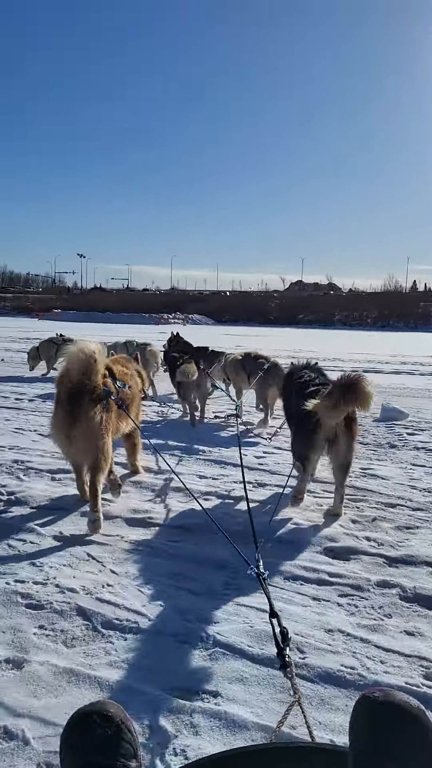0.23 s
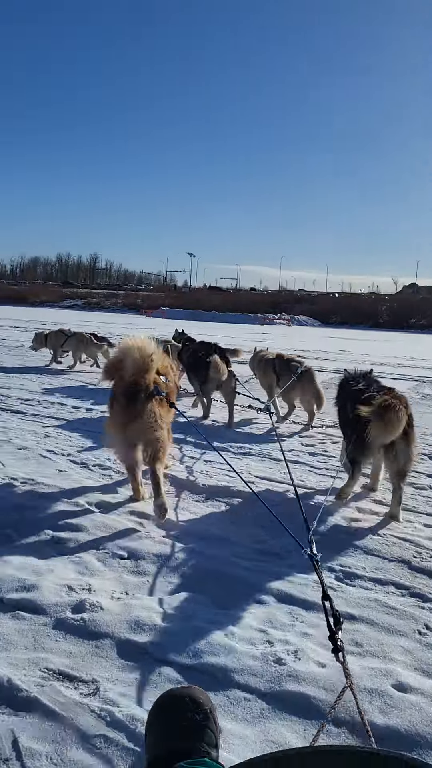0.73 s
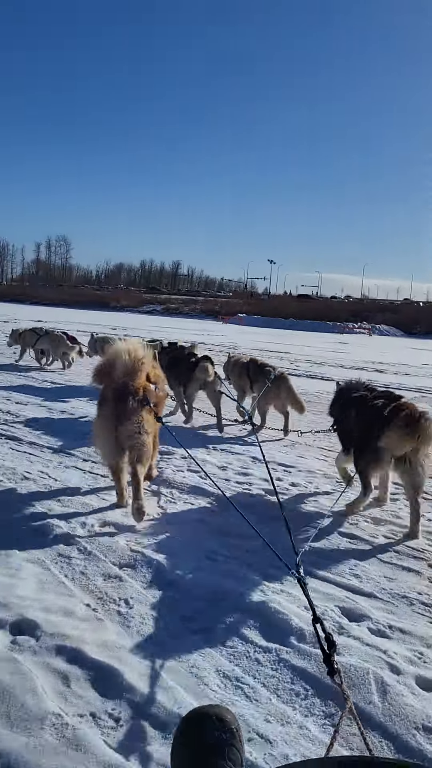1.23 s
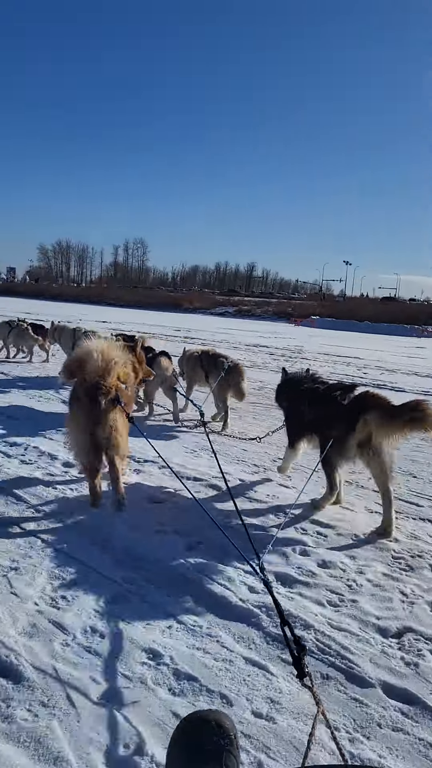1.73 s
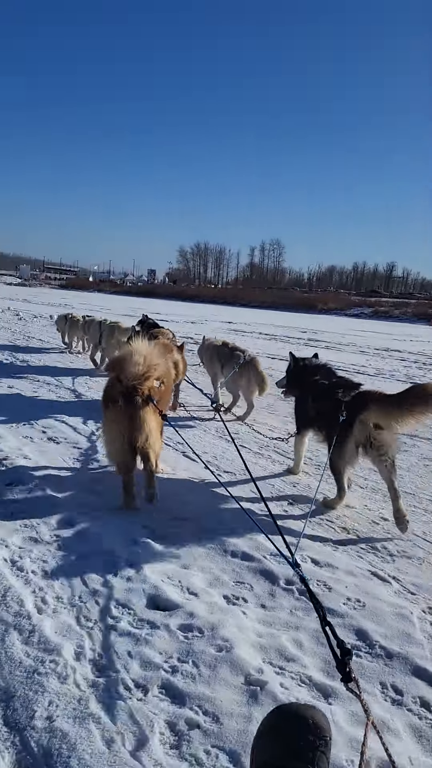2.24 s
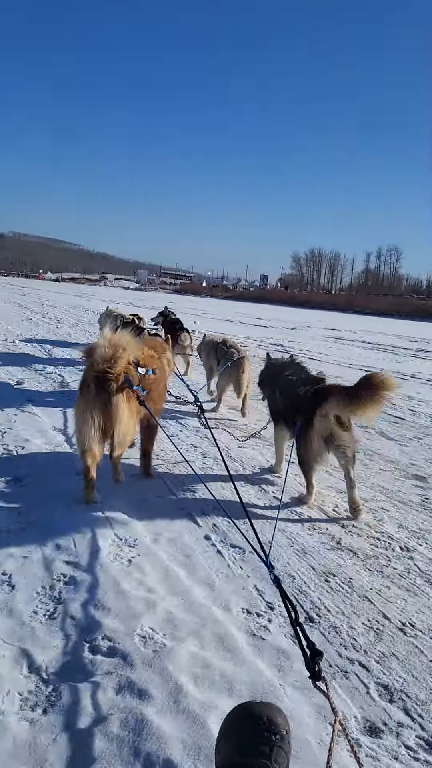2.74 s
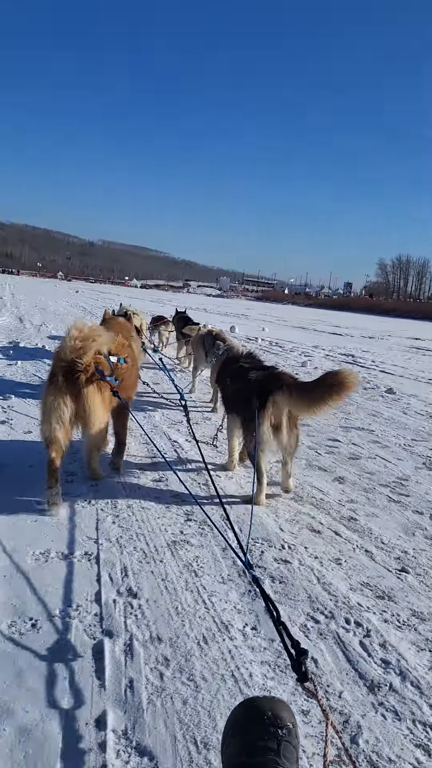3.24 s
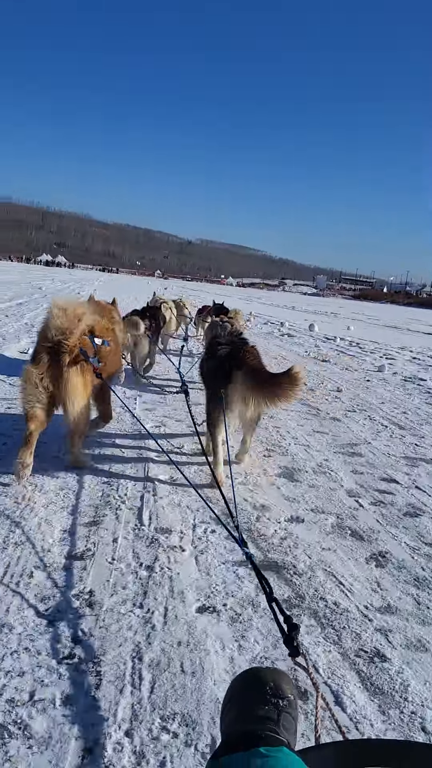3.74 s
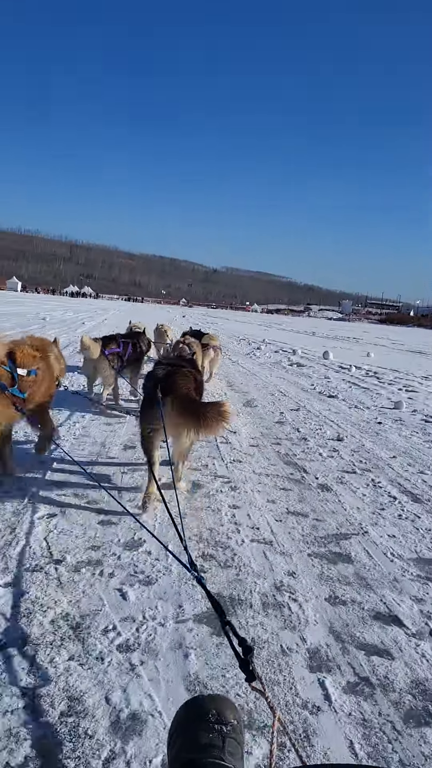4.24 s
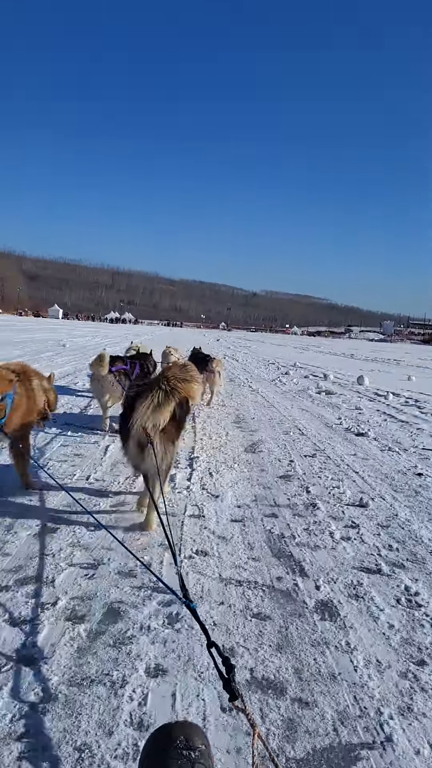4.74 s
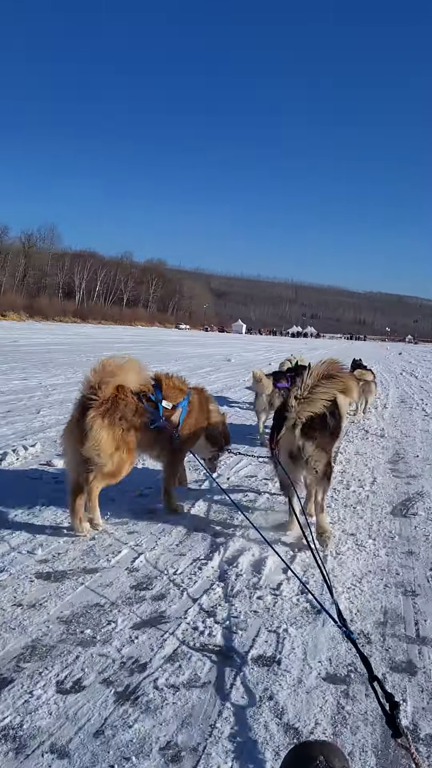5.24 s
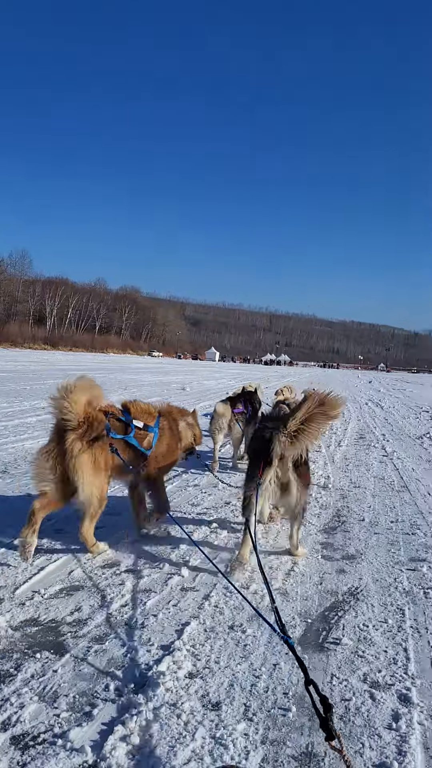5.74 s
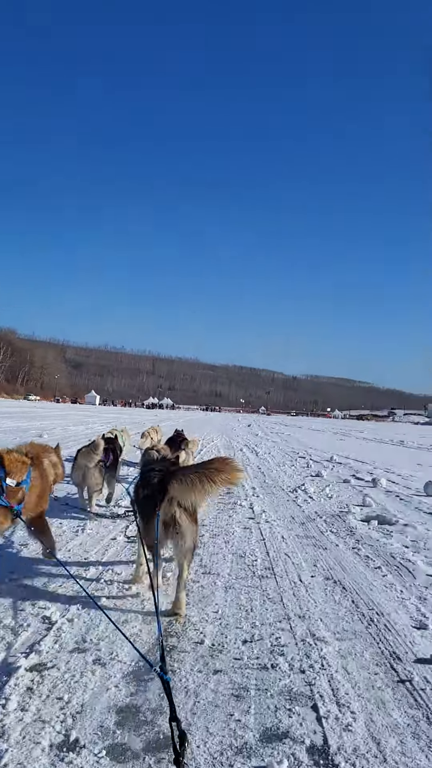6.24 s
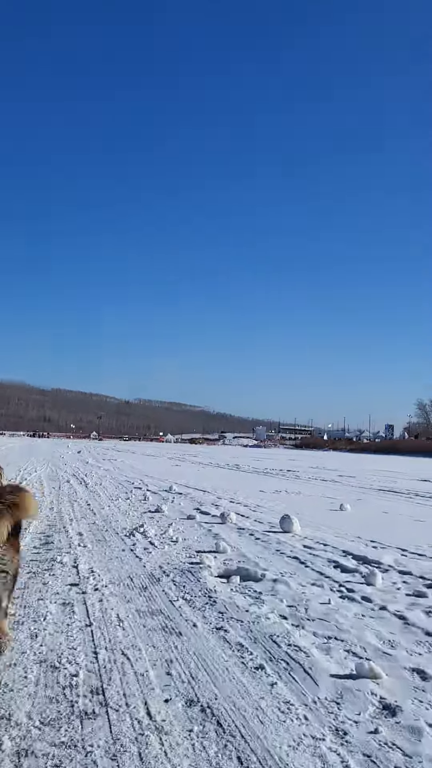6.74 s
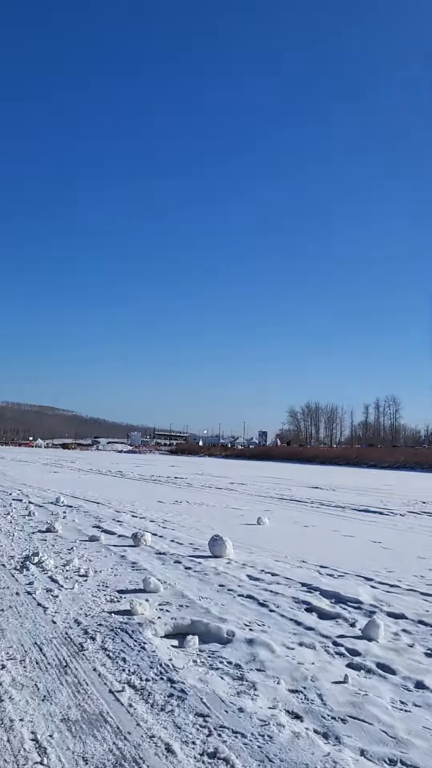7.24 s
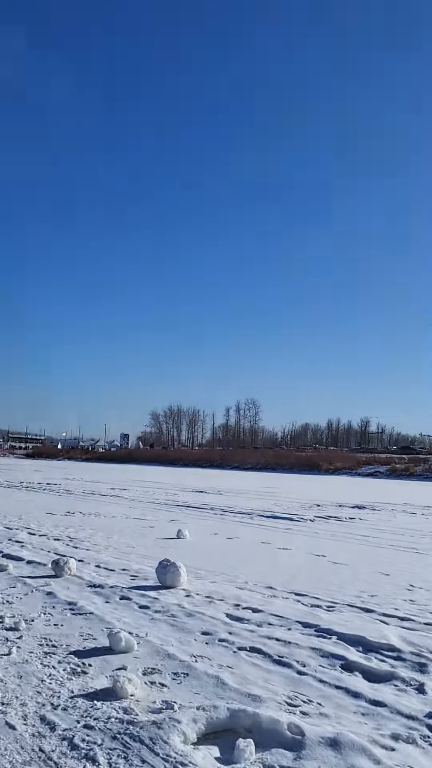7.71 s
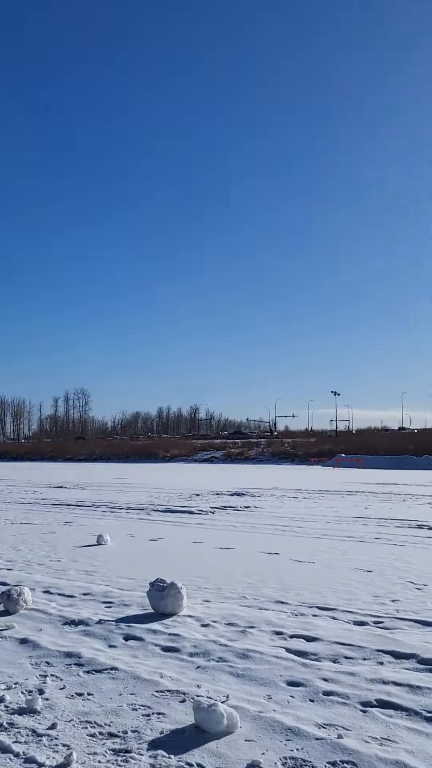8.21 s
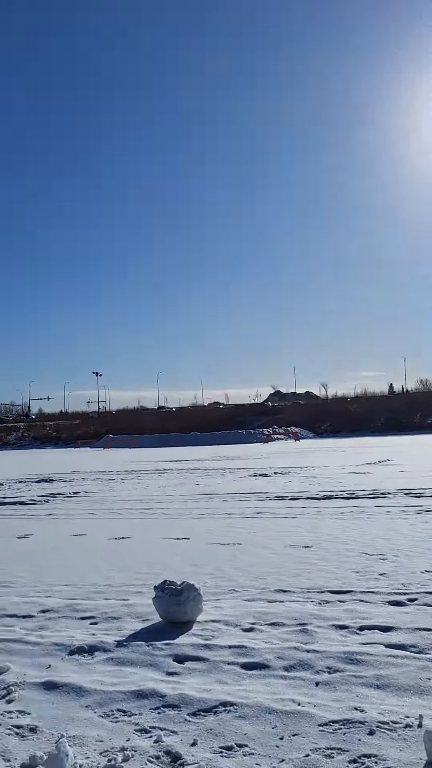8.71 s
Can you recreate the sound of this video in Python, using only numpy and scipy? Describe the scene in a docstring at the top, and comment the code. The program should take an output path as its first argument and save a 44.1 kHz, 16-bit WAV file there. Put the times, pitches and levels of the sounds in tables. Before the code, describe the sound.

A dog sled glides over crusty packed snow, its hull booming and bumping while runners hiss and crunch, with faint metal harness clips jingling midway.

```python
"""Open packed snow, heard from a microphone pair riding on a sled that is pulled along and swings to its side.
Shaped noise bands make the hull's boom, the frame's drone, the runners' hiss, the snow spray and the wind;
decaying sines make the bumps under the hull, the ring of breaking crust and the knocks on the frame's slats.
Resonators struck by clicks make the snapping crystals and the small metal harness clips jingling ahead."""
import sys
import numpy as np
from scipy import signal
from scipy.io import wavfile
from scipy.ndimage import uniform_filter1d

SR = 44100
rng = np.random.default_rng(int(sys.argv[2]) if len(sys.argv) > 2 else 0)


def master_out(mix):
    """Clip the mix to full scale and print it as 16-bit PCM to the path in sys.argv[1]."""
    frames = np.transpose(np.atleast_2d(mix))
    ceiling = np.clip(frames, -1, 1)
    pcm = np.round(ceiling * 32767).astype(np.int16)
    wavfile.write(sys.argv[1], SR, pcm)


N = 395577

# bumps under the hull: (time [s], relative level [dB], ring frequency [Hz])
THUMPS = [(0.229, -8, 264), (0.312, -3, 294), (0.349, 2.5, 250), (0.379, -10, 230), (0.432, -2, 278),
          (0.489, -26, 232), (0.534, -6, 220), (0.649, 1, 210), (0.759, -3, 286), (0.799, -5, 307),
          (0.931, -0.5, 210), (0.982, -3, 284), (1.191, -5, 178), (1.289, -5.5, 236), (1.369, -8.5, 259),
          (1.406, -3, 184), (1.515, -3.5, 237), (1.839, -12, 210), (1.993, -4.5, 241), (2.116, -1, 259),
          (2.177, -5.5, 256), (2.495, -5, 275), (2.721, 1, 282), (2.863, -7, 190), (2.996, -4, 240),
          (3.042, -2, 227), (3.373, -4.5, 192), (3.57, -6, 278), (3.968, -2, 185), (4.047, -0.5, 259),
          (4.12, -0.5, 270), (4.276, -11.5, 228), (4.321, -5.5, 260), (4.518, -1.5, 278),
          (5.037, -6.5, 272), (5.249, -13.5, 240), (5.552, -1.5, 279), (5.865, -4.5, 253), (5.944, -8, 237),
          (6, -8, 294), (6.131, -6.5, 286), (6.248, -4.5, 277), (6.357, -2, 270), (6.617, -4, 262),
          (6.518, -16.5, 285), (6.683, -6.5, 254), (6.859, -8, 270), (6.958, -6.5, 212), (7.03, -10, 195),
          (7.323, -4.5, 244), (7.495, -4, 276), (7.57, -5, 270), (7.726, -7, 266), (8.173, -3, 250),
          (8.22, -9.5, 200), (8.323, -8, 221), (8.537, -9, 164), (8.717, -0.5, 270)]
# crust breaking, frame slapping:
# (time [s], relative level [dB], pitch [Hz], frame knock over the crack level [dB], crumbling time [s])
CRACKS = [(0.1432, -20.5, 1550, 4.5, 0.017), (0.2895, -18.5, 2660, 3, 0.02), (0.313, -23.5, 4230, -2, 0.02),
          (0.382, -19, 2530, 3.5, 0.022), (0.408, -20, 2400, 9, 0.014), (0.445, -20, 4000, -5, .012),
          (0.4754, -23, 3770, -19, 0.014), (0.497, -21.5, 3800, -2, 0.016), (0.552, -26, 2500, 14, .012),
          (0.5916, -22.5, 2030, -2, 0.022), (0.635, -24.5, 1300, 10.5, 0.025),
          (0.678, -23.5, 2600, -14, 0.016), (0.704, -24, 2590, -8, 0.0064), (0.796, -17, 1420, -4.5, 0.026),
          (0.8245, -20, 1130, 4, 0.0083), (0.882, -25, 1380, 6.5, .012), (0.928, -20.5, 1490, -7, 0.016),
          (1.041, -25, 1930, -9, 0.009), (1.113, -19, 1260, -3, 0.023), (1.145, -19, 4000, -8, 0.0067),
          (1.192, -26, 2640, -14, 0.022), (1.211, -21, 2700, 2, 0.026), (1.269, -13, 2620, -10, 0.0048),
          (1.284, -17, 2900, -8, 0.014), (1.4274, -18, 2650, -8, 0.015), (1.5057, -27, 1560, 12, 0.011),
          (1.576, -25, 1950, 3, 0.0084), (1.644, -28, 2670, -17, 0.013), (1.6988, -31, 1800, -18, 0.0081),
          (1.727, -27, 2400, 7, 0.022), (1.834, -35, 2400, -1, 0.0091), (1.901, -26.5, 2700, -8, .045),
          (2.048, -25.5, 2600, 1, 0.012), (2.118, -17, 2120, -23, 0.0057), (2.151, -27.5, 4800, -1, .012),
          (2.278, -28, 1260, -5, 0.015), (2.298, -22, 1600, -7, .012), (2.484, -29, 2600, -8, 0.01),
          (2.562, -25, 1610, -10, 0.019), (2.8395, -21, 1560, -3, .01), (2.866, -13.5, 1590, -4, 0.016),
          (2.9766, -25.5, 2340, 6, .03), (3.111, -23, 2110, 7, 0.011), (3.162, -27, 3100, 6, 0.0079),
          (3.2047, -22.5, 1530, 3, 0.036), (3.409, -20.5, 2280, 11.5, 0.0098),
          (3.4293, -31.5, 1380, 22.5, 0.016), (3.5253, -19, 2660, -21, 0.048), (3.567, -29, 4020, 4, 0.034),
          (3.5983, -18.5, 1810, -14, 0.055), (3.7256, -21, 2350, 3, 0.011), (3.771, -16.5, 2650, -2, 0.014),
          (3.8142, -32, 1560, -10, 0.0084), (3.8573, -22, 2830, 11.5, 0.021), (3.925, -30, 2140, -5, 0.016),
          (3.956, -19, 1460, -22, 0.037), (4.0324, -20.5, 2540, -21, 0.027),
          (4.0442, -28, 1380, -21, 0.013), (4.0845, -24, 4150, -9, 0.031), (4.11, -21, 2470, 7, 0.023),
          (4.14, -15.5, 2360, -19, 0.016), (4.19, -20.5, 4300, 1, 0.014), (4.258, -15, 2000, -7, 0.015),
          (4.29, -21.5, 1760, 4, 0.04), (4.41, -21, 1380, -3, 0.027), (4.468, -22.5, 2390, -19, 0.04),
          (4.497, -23, 2330, 0, 0.016), (4.548, -22, 1360, -1, 0.051), (4.6224, -21.5, 2530, -21, 0.03),
          (4.698, -20.5, 4370, -1, 0.0071), (4.7357, -17, 1390, -1, 0.03), (4.8183, -19, 2640, -3, 0.022),
          (4.946, -19.5, 1375, -19, 0.017), (5.021, -19, 2580, -3, 0.018), (5.038, -20.5, 1390, 6, .015),
          (5.064, -25, 1210, -6, 0.03), (5.118, -24, 2010, -5, .01), (5.172, -22, 1890, -23, 0.013),
          (5.207, -21.5, 1780, -15, 0.014), (5.222, -32, 1700, -5, .01), (5.266, -19, 1390, -13, 0.014),
          (5.282, -26.5, 1910, -4, .008), (5.307, -21, 2010, -14, 0.005), (5.358, -22, 1870, -22, 0.015),
          (5.393, -23, 2150, -5, 0.01), (5.419, -16, 2260, 0, 0.016), (5.454, -19, 4200, 4, .01),
          (5.4877, -18.5, 1570, 2, 0.012), (5.5198, -20, 1350, -5, 0.027), (5.555, -17.5, 4500, 5.5, 0.013),
          (5.6218, -19.5, 1370, -3, 0.018), (5.6936, -20.5, 2000, -12, 0.011),
          (5.725, -31, 2280, -8, 0.0058), (5.749, -19.5, 2240, -3, 0.015),
          (5.7917, -21.5, 1360, -12, 0.016), (5.8343, -20, 2320, 0, 0.025), (5.883, -21, 2760, -4, 0.044),
          (5.996, -18, 2900, -9, 0.0086), (6.048, -20, 1920, -16, 0.012), (6.073, -29, 4500, -8, .008),
          (6.118, -22.5, 4270, -8, .01), (6.1555, -21, 2730, 4, .015), (6.183, -15, 1370, -2.5, 0.013),
          (6.2412, -18, 2840, -3, 0.02), (6.256, -28.5, 2700, -1, 0.011), (6.378, -20.5, 2670, -1, 0.027),
          (6.461, -25, 2080, -15, 0.059), (6.567, -25, 2360, -3, 0.0098), (6.6356, -29, 2500, 8.5, 0.015),
          (6.761, -22, 2880, 0, 0.015), (6.7822, -19.5, 1680, -2, 0.033), (6.83, -24, 3900, -8, .008),
          (6.857, -18.5, 1770, -10, 0.01), (6.8848, -23.5, 2000, 2, 0.012), (6.9433, -22, 1760, -53, 0.017),
          (6.9852, -17, 1370, -0.5, 0.017), (7.0258, -17.5, 1360, 2, 0.025), (7.0695, -22, 2240, 0, .015),
          (7.097, -29.5, 4500, -10, .008), (7.124, -28, 2000, -10, .008), (7.165, -19.5, 2000, -12, 0.025),
          (7.238, -15.5, 1300, -26, 0.028), (7.271, -26, 2100, -13, 0.02),
          (7.2868, -17.5, 2290, -21, 0.025), (7.3238, -14.5, 1590, 1.5, 0.016),
          (7.364, -22.5, 3500, -13, .015), (7.403, -19, 1390, 6.5, 0.012), (7.42, -14.5, 4530, 1, .012),
          (7.467, -16.5, 1820, -2, 0.01), (7.4904, -13, 2360, -3, 0.027), (7.509, -19.5, 2370, -6, 0.0069),
          (7.543, -23, 2230, 1, .01), (7.569, -13, 2310, -9, 0.006), (7.5923, -11, 2760, -8, 0.022),
          (7.607, -23, 2300, -20, 0.0067), (7.6557, -27, 1960, -8, .02), (7.721, -16, 2630, -13, 0.01),
          (7.738, -18, 2200, -12, 0.01), (7.7795, -18, 2120, -13, 0.0086), (7.8132, -15, 2640, -15, 0.014),
          (7.829, -18, 2180, 4, 0.0088), (7.87, -14.5, 2010, 0.5, 0.0098), (7.886, -14, 2050, -13, .025),
          (7.9286, -9.5, 2290, -5.5, 0.0039), (8.023, -17.5, 1360, -6, 0.036), (8.034, -18, 1290, -5, .01),
          (8.07, -19, 1850, -11, 0.072), (8.094, -13.5, 1930, -9, 0.011), (8.163, -19, 2690, -1, 0.011),
          (8.171, -14.5, 3870, -4, 0.01), (8.207, -17, 4600, -10, .006), (8.281, -14.5, 2060, -17, 0.015),
          (8.304, -18, 3000, -8, .006), (8.328, -17, 2070, -17, 0.018), (8.3469, -13, 1380, -1, 0.043),
          (8.397, -19, 2220, -4, 0.012), (8.411, -12, 1340, -2, 0.0079), (8.4723, -13.5, 2300, -5, 0.023),
          (8.504, -17, 1930, -16, 0.02), (8.54, -14, 1850, 3.5, 0.016), (8.565, -16, 2100, -1, 0.011),
          (8.621, -27, 1660, -10, 0.017), (8.648, -15.5, 1910, -5, 0.005), (8.679, -13, 1690, -14, 0.018),
          (8.7323, -14, 1550, 7, 0.013), (8.788, -11.5, 1900, -20, 0.023), (8.827, -19, 2140, -12, 0.02)]
# noise spectrum of the runners on snow: (frequency [Hz], relative density [dB])
RUNNERS = [(530, -34), (900, -9), (1260, -3.5), (1700, -4.5), (2200, -5.5), (2640, -6), (3060, -9),
           (3800, -8.5), (4530, -7), (6220, -19.5), (7800, -15), (9500, -78), (12400, -78), (20900, -120)]


def booming(hull_db):
    """Forced panel vibration: the shaken hull radiates low noise bands that follow the load."""
    # noise spectrum of the hull: (frequency [Hz], relative density [dB])
    hull_spectrum = [(41, -53), (70, -14.5), (188, -0.5), (263, -0.5), (288, 4), (354, -24), (457, -19),
                     (500, -31), (650, -32), (1100, -120)]
    return amp(hull_db) * banded(hull_spectrum, together_db=2.0, own_db=2.5, rate=34.0, count=5)


def thumps():
    """Impulse response of a damped panel: each bump rings the hull panel that it loads."""
    s, level_db, hz = np.transpose(THUMPS)
    return rings(s, level_db + 6.0, hz, rise_s=0.0046, cycles=12.9)


def droning(frame_db, turn):
    """Structure-borne sound: glide, cracks and bumps drive the frame; its colour changes with the turn."""
    # noise spectrum of the frame heard from ahead: (frequency [Hz], relative density [dB])
    ahead_spectrum = [(190, -35), (330, -1.5), (540, -14), (638, -15), (720, -13.5), (810, -13),
                      (900, -17.5), (1300, -27), (1690, -60.5), (2860, -120)]
    # noise spectrum of the frame heard from the side: (frequency [Hz], relative density [dB])
    side_spectrum = [(190, -15), (330, -47), (387, 4), (455, 5.5), (540, -2.5), (650, -11), (780, -11),
                     (850, -22), (1300, -14.5), (1690, -11), (2860, -120)]
    s, crack_db, _, knock_db, _ = np.transpose(CRACKS)
    bump_s, bump_db, _ = np.transpose(THUMPS)
    crack_knocks = crumble(crack_db + knock_db, 0.0022, 0.0084)
    bump_knocks = burst(marks(bump_s, bump_db - 19.5), 0.0013, 0.071)
    level = np.hypot(amp(frame_db), np.hypot(crack_knocks, bump_knocks))
    grain = grains(200., 4.5, 1.8)

    def swell(hz):
        """Directivity: the band's level moves from the front spectrum towards the side one."""
        return level * amp(turn * (at_hz(side_spectrum, hz) - at_hz(ahead_spectrum, hz)))

    # a knock sets one slat of the frame ringing, picked by chance
    slat_hz = rng.choice([445, 552, 598, 790, 900], len(s))
    slats = rings(s + 0.0021, crack_db + knock_db - 7.5, slat_hz, rise_s=0.0016, cycles=22.0)
    drone = banded(ahead_spectrum, together_db=0.0, own_db=2.5, rate=16.8, swell=swell, grain=grain, count=6)
    return drone + slats


def crunching(runner_db, grit, bright_db, crumbs):
    """Friction and brittle fracture: the runners hiss; each crack ticks and rings briefly at its pitch."""
    trail_hiss_db = -52.5   # paws and snow further off, never silent
    s, crack_db, crack_hz, _, _ = np.transpose(CRACKS)
    glide = np.hypot(amp(runner_db) * grit, amp(trail_hiss_db))

    def swell(hz):
        """Spectral weighting: each crack is strongest in the bands near its own pitch."""
        octaves_off = np.log2(hz / crack_hz)
        lean_db = 4.0 * np.exp(-(octaves_off / 0.3) ** 2) + rng.normal(0, 2.5, len(s))
        lean_db += bright_db * (hz > 6000)   # the top follows how bright the crack is
        return np.hypot(glide, crumble(crack_db + lean_db - 6.5, 0.0007, 0.019, crumbs))

    ring = rings(s, crack_db - 14.5, crack_hz, rise_s=0.00036, cycles=145.0)
    tick_band = signal.butter(2, [1100, 7500], "band", fs=SR, output="sos")
    # the dry tick that starts a crack is weaker on soft snow
    tick = signal.sosfilt(tick_band, marks(s, crack_db + 8.5) * (1 - softness()))
    grain = grains(570.0, 2.6, 2.06)
    snaps = crackle(np.hypot(glide, crumble(crack_db - 7.5, 0.0003, 0.026, crumbs)))
    hiss = banded(RUNNERS, together_db=0.5, own_db=2.5, rate=46, swell=swell, grain=grain, count=5)
    return hiss + ring + ports(tick, 2000) + snaps


def crackle(level):
    """Shot noise: single crystals snap at random, each click exciting a short ring at one of many pitches."""
    per_s, ring_cycles = 1100, 28.0   # mean snaps a second; cycles in a 60 dB fall
    far_share = 0.2   # a snap under one runner also reaches the far port
    sizes = amp(4.7 * np.minimum(rng.exponential(1, N), 2.5)) * (rng.random(N) < per_s / SR)
    pitches, out = np.geomspace(1100, 6500, 22), np.zeros((2, N))
    dealt = rng.integers(0, 2 * len(pitches), N)   # a pitch and a side for every click
    for k, hz in enumerate(pitches):
        near_left, near_right = sizes * level * (dealt == [[k], [k + len(pitches)]])
        clicks = ports(near_left, hz) * [[1], [far_share]] + ports(near_right, hz) * [[far_share], [1]]
        ring = resonate(clicks + 1e-18, hz, ring_cycles / hz)
        out += amp(at_hz(RUNNERS, hz)) * np.sqrt(hz) * ring
    return rms_one(out) * np.sqrt(np.mean(level ** 2)) * amp(-3)


def loose_grit(per_s, spread_db):
    """Random impulse process: small unforeseen crunches lift a gain by uneven amounts."""
    sizes = amp(spread_db * np.minimum(rng.exponential(1, N), 3))
    return 1 + 0.3 * burst(sizes * (rng.random(N) < per_s / SR), 0.0015, 0.029)


def grains(per_s, spread_db, smooth_share, t60=0.0021):
    """Clustered shot noise: breaking crystals give uneven spikes over a smooth part; a gain of rms 1."""
    born = rng.random(N) < per_s * amp(5.0 * drift(25)) / SR
    sizes = amp(spread_db * np.minimum(rng.exponential(1, N), 4))
    spikes = burst(born * sizes, .0001, t60)
    return rms_one(np.hypot(smooth_share, rms_one(spikes)))


def crumble(level_db, rise_s, t60, crumbs=1):
    """Brittle and yielding fracture: a sharp break, while soft crust crumbles on in lumps."""
    tail_s, tail_db = 0.012, -32   # a faint tail 12 ms after each break, far below it
    soft_muffles = 0.15   # soft crust blunts the sharp break
    s, length_s = np.transpose(CRACKS)[[0, -1]]
    ends = s + np.clip(length_s, .002, .08)
    steps = np.cumsum(marks(s, level_db) - marks(ends, level_db))
    smooth = np.exp(-1 / (0.0035 * SR))
    held = signal.lfilter([1 - smooth], [1, -smooth], np.maximum(steps, 0))
    sharp = burst(marks(s, level_db) + marks(s + tail_s, level_db + tail_db), rise_s, t60)
    soft = softness()
    return np.hypot((1 - soft_muffles * soft) * sharp, soft * held * crumbs)


def softness():
    """Yielding of the snow: how much a crack crumbles on, sample by sample."""
    # softness of the crust: (time [s], share [0-1])
    soft_snow = [(0, 0.58), (4.4, 0.47), (5.0, 0.49), (7.9, 0.23), (8.3, 0.16), (8.97, 0.3)]
    return in_time(soft_snow)[0]


def lift(times, depth_db, lead_s):
    """Unloading before contact: a level change in dB that deepens towards each landing and ends there."""
    landings = marks(times, 0)
    ahead = signal.lfilter([1], [1, -np.exp(-1 / (lead_s * SR))], landings[::-1])[::-1]
    return -depth_db * np.minimum(ahead, 1)


def skipping():
    """Loss of contact: level change in dB while the runners are clear of the snow and the hiss drops out."""
    # runners off the snow: (time [s], length [s], drop [dB])
    skips = [(0.184, 0.11, 1), (0.583, 0.037, 17), (0.781, 0.019, 33), (0.877, 0.024, 6),
             (1.16, 0.037, 9.5), (1.345, 0.02, 8.5), (2.233, 0.051, 6), (3.27, 0.066, 6.5),
             (4.227, 0.027, 8), (4.373, 0.03, 6.5), (4.78, 0.043, 2.5), (5.142, 0.039, 14),
             (5.223, 0.045, 2), (5.321, 0.052, 9), (5.38, 0.033, 6), (7.677, 0.022, 5), (7.744, 0.029, 11),
             (7.797, 0.031, 8), (7.96, 0.054, 3), (8.139, 0.065, 3)]
    edge_s = 0.0072
    t, drop = np.arange(N) / SR, np.zeros(N)
    for start, length, drop_db in skips:
        drop += drop_db * ((t > start) & (t < start + length))
    return -uniform_filter1d(drop, int(edge_s * SR))


def spraying(runner_db, grit, bright_db, crumbs):
    """Broadband noise of many small impacts: snow spray follows the runners and is thrown up by cracks."""
    # noise spectrum of the spray: (frequency [Hz], relative density [dB])
    spray_spectrum = [(4710, -14), (8000, -29), (9360, -3.5), (13600, 6.5), (15600, -12)]
    # spray over the runner hiss: (time [s], level [dB])
    spray_rise = [(0, -23), (2.5, -18.5), (3.5, -14), (4.3, -23), (6, -14), (7.4, -25), (8.97, -18)]
    crack_db = np.transpose(CRACKS)[1]
    steady = amp(runner_db + in_time(spray_rise)[0]) * grit
    thrown = crumble(crack_db - 27 + bright_db, .0012, 0.018, crumbs)
    level = np.hypot(np.hypot(steady, thrown), amp(-60.5))   # fine powder hisses steadily
    noise = banded(spray_spectrum, together_db=1.5, own_db=2.5, rate=85)
    return level * noise * amp([[-1.5], [1.5]])   # it flies up on the right


def jingles():
    # harness clips touching: (time [s], relative level [dB])
    touch_rows = [(3.266, -33), (3.6084, -38), (3.9684, -47), (4.2632, -40), (4.6229, -43), (4.7456, -36),
                  (5.0055, -47), (5.0459, -45), (5.0908, -50), (5.7174, -40), (5.7454, -50), (5.7673, -51),
                  (5.7957, -51), (5.8501, -38), (5.8864, -48), (5.9184, -45), (6.128, -40), (6.2846, -63),
                  (6.3096, -35), (6.3364, -47), (6.4303, -51), (6.4727, -43), (6.5434, -40), (6.8912, -40)]
    # resonances of a clip: (frequency [Hz], relative level [dB], 60 dB decay time [s])
    clip_modes = [(14300, -3, 0.073), (13000, 1.5, 0.032), (11200, -5, 0.036), (9060, -19, 0.044)]
    (s, touch_db), out = np.transpose(touch_rows), np.zeros(N)
    uneven_db = 3 * rng.standard_normal((len(clip_modes), len(s)))   # the modes are struck unevenly
    for (hz, mode_db, t60), chance_db in zip(clip_modes, uneven_db):
        touches = marks(s, touch_db + mode_db + chance_db)
        rattle = burst(touches, 0.0027, 0.27) * rng.standard_normal(N) * amp(-39)
        out += resonate(touches + rattle, hz, t60)
    return ports(out, 12000) * amp([[-2.5], [2.5]])


def buffeting():
    """Turbulent pressure on the ports: gusts lift the upper rumble fully, the deepest part only a little."""
    # wind on the ports: (time [s], relative level [dB])
    gusts = [(0.0, -33.5), (2.37, -25.5), (2.55, -51), (2.62, -24), (2.7, -34), (2.85, -19.5),
             (3.32, -65.5), (3.37, -21), (3.67, -52), (3.97, -39.5), (5.17, -42.5), (7.04, -31.5),
             (7.14, -52), (7.39, -27), (8.22, -31.5), (8.37, -20), (8.67, -29), (8.74, -10), (8.92, -22),
             (8.97, -39)]
    # noise spectrum of the wind: (frequency [Hz], relative density [dB])
    wind_spectrum = [(20, -15), (31, -35), (40, -3.5), (60, 4), (100, 2), (130, 9.5), (170, -47)]
    wind_db = in_time(gusts)[0]
    calm_db = np.mean(wind_db)

    def swell(hz):
        """Frequency-dependent gusting: the share of the gust grows with frequency."""
        return amp(calm_db + np.clip(np.log2(hz / 45), .15, 1) * (wind_db - calm_db))

    return banded(wind_spectrum, together_db=1.5, own_db=0.7, rate=4.1, swell=swell)


def banded(spectrum, together_db, own_db, rate, swell=lambda hz: 1, grain=1, count=3):
    """Subtractive synthesis: count noise bands an octave, flickering partly in step, partly alike at both ports.

    The sum has rms 1 before swell(hz), the envelope of a band; rate is the flicker corner in Hz."""
    # left-right likeness: (frequency [Hz], share [0-1])
    likeness = [(30, .1), (70, 0.69), (150, 1), (300, 0.95), (600, 0.89), (900, 0.96), (1200, 0.36),
                (1600, 0.22), (3000, 0.1), (12000, 0.067)]
    # left-right likeness with the pair turned: (frequency [Hz], share [0-1])
    turned_likeness = [(30, .25), (70, 0.9), (150, 1), (300, 1), (550, 0.99), (800, 0.64), (1500, 0.4),
                       (2500, 0.77), (4200, 0.15), (6000, 0.076)]
    turned = port_lag() / 6
    low_hz, high_hz = spectrum[0][0], min(spectrum[-1][0], .45 * SR)
    edges = low_hz * 2 ** np.arange(0, np.log2(high_hz / low_hz) + .01, 1 / count)
    out, power, together = 0, 0, drift(rate)
    white = grain * rng.standard_normal((2, 3, N))   # neighbouring bands use separate noise
    for k, (low, high) in enumerate(zip(edges, edges[1:])):
        hz = np.sqrt(low * high)
        if at_hz(spectrum, hz) < -50:   # not heard
            continue
        band_filter = signal.butter(2, [low, high], "band", fs=SR, output="sos")
        bands = signal.sosfilt(band_filter, white[k % 2])   # one shared, two of the ports' own
        alike = (1 - turned) * at_hz(likeness, hz) + turned * at_hz(turned_likeness, hz)
        alike = np.clip(alike, 0, 1)
        gain = amp(at_hz(spectrum, hz) + together_db * together + own_db * drift(rate))
        band = gain * (np.sqrt(alike) * ports(bands[0], hz) + np.sqrt(1 - alike) * bands[1:])
        out, power = out + swell(hz) * band, power + np.mean(band ** 2)
    return out / np.sqrt(power)


def rings(times, level_db, pitches, rise_s, cycles):
    """Damped oscillation: each blow swells in and falls 60 dB in the given cycles of its own pitch."""
    out, t = np.zeros((2, N + SR)), np.arange(SR // 6) / SR
    phases = rng.random(len(times))
    for s, gain, hz, phase in zip(times, amp(level_db), pitches, phases):
        shape = (1 - np.exp(-t / rise_s)) * amp(-60 * t * hz / cycles)
        at = int(s * SR)
        out[:, at:at + len(t)] += ports(gain * shape * np.sin(2 * np.pi * (hz * t + phase)), hz)
    return out[:, :N]


def resonate(drive, hz, t60):
    """Second-order resonance: a two-pole filter rings at hz and falls 60 dB in t60 seconds."""
    r, w = amp(-60 / (t60 * SR)), 2 * np.pi * hz / SR
    return signal.lfilter([0, np.sin(w)], [1, -2 * r * np.cos(w), r * r], drive)


def burst(clicks, rise_s, t60):
    """Exponential attack and decay: an envelope that jumps up at each click and dies away."""
    fall, rise = amp(-60 / (t60 * SR)), np.exp(-1 / (rise_s * SR))
    return signal.lfilter([1 - rise], np.convolve([1, -fall], [1, -rise]), clicks)


def marks(times, level_db):
    """Impulse train: one click at each time, over a vanishing floor."""
    clicks = np.full(N, 1e-18)
    np.add.at(clicks, np.minimum((np.asarray(times) * SR).astype(int), N - 1), amp(level_db))
    return clicks


def drift(rate):
    """Low-passed random process: coarse noise through a double one-pole at rate Hz; spread 1."""
    r = np.exp(-40 * np.pi * rate / SR)   # one value every 20 samples
    slow = signal.lfilter([1], [1, -2 * r, r * r], rng.standard_normal(N // 20 + 2002))[2000:]
    return np.interp(np.arange(N) / 20, np.arange(len(slow)), rms_one(slow))


def ports(shared, hz):
    """Interaural-style time difference: one sound reaches the nearer right port first."""
    # lag of the left port: (frequency [Hz], delay [samples])
    left_lag = [(60, 20), (170, 16), (260, 13), (500, 11), (1100, 11), (2700, 15), (16000, 15)]
    return np.array([np.roll(shared, round(at_hz(left_lag, hz))), shared])


def port_lag():
    """Path difference: extra delay in samples as the left port swings further away."""
    # added lag of the left port: (time [s], delay [samples])
    turned_lag = [(0, 0), (5.9, 0), (6.4, 6), (8.97, 6)]
    return in_time(turned_lag)[0]


def amp(db):
    """Level to amplitude: decibels as a gain."""
    return 10 ** (np.asarray(db) / 20)


def rms_one(x):
    """Power normalisation: scale to rms 1."""
    return x / np.sqrt(np.mean(x ** 2) + 1e-20)


def in_time(rows):
    """Linear interpolation: each column of a curve, sample by sample."""
    s, *columns = np.transpose(rows)
    return [np.interp(np.arange(N) / SR, s, c) for c in columns]


def at_hz(points, hz):
    """Logarithmic pitch scale: read a table on a log-frequency axis."""
    table_hz, values = np.transpose(points)
    return np.interp(np.log(hz), np.log(table_hz), values)


def scene():
    """Coupled sources: the load drives hull, frame and runners; cracks excite frame, runners and spray."""
    # load on the hull as the sled pitches, heard as its boom: (time [s], level [dB])
    load = [(0.0, -11), (0.07, -10), (0.2, -24), (0.4, -8.5), (0.6, -18.5), (0.65, -4), (0.7, -18),
            (0.9, -19.5), (1.0, -6), (1.12, -21.5), (1.22, -10.5), (1.35, -20), (1.45, -8.5), (1.57, -17),
            (1.85, -12.5), (1.87, -20), (2.0, -15), (2.9, -15.5), (2.97, -22.5), (3.0, -17), (3.3, -15.5),
            (3.37, -15.5), (3.49, -19), (3.95, -16), (3.97, -19), (4.02, -32), (4.05, -12.5), (4.17, -6),
            (4.24, -23), (4.32, -12.5), (4.37, -21.5), (4.52, -14), (4.6, -21), (5.4, -19.5), (5.47, -13.5),
            (5.52, -21.5), (5.57, -14.5), (5.59, -23), (6.39, -18.5), (6.42, -20.5), (6.7, -17.5),
            (6.75, -25), (6.99, -18.5), (7.14, -23), (8.29, -16), (8.62, -22.5), (8.72, -14), (8.77, -16.5),
            (8.82, -15), (8.97, -24)]
    # glide under the pitching: (time [s], frame drone level [dB], runner hiss level [dB])
    glide_rows = [(0.0, -23.5, -34), (0.15, -28.5, -38.5), (0.26, -35, -47.5), (0.37, -28.5, -41),
                  (0.5, -23.5, -41.5), (0.7, -29, -39), (1.7, -26, -41.5), (3.95, -28.5, -38.5),
                  (5.17, -32, -43.5), (6.0, -32, -40.5), (6.59, -32.5, -43.5), (7.02, -38, -42),
                  (7.77, -34.5, -43), (8.64, -28, -32.5), (8.97, -27, -38)]
    # the pair swings to the side: (time [s], share [0-1])
    turn_rows = [(0, 0), (5.9, 0.08), (6.5, 0.64), (7.2, 0.88), (8.97, 0.5)]
    # shares of the load's swing about its 1 s running mean, and of the runners' skips
    frame_follows, runners_follow = 0.45, 0.45
    frame_feels_skip, hull_feels_skip = 0.41, 0.58
    (hull_db,), (frame_db, runner_db) = in_time(load), in_time(glide_rows)
    turn = np.clip(in_time(turn_rows)[0], 0, 1)
    swing_db = hull_db - uniform_filter1d(hull_db, SR)

    # the hull comes off the snow just before a bump, the runners unload just before a crack
    bump_lift_db = lift(np.transpose(THUMPS)[0], depth_db=1, lead_s=0.021)
    crack_lift_db = lift(np.transpose(CRACKS)[0], depth_db=0.5, lead_s=0.025)
    skip_db = skipping()
    swing_db = swing_db + bump_lift_db
    hull_db = hull_db + bump_lift_db + hull_feels_skip * skip_db
    frame_db = frame_db + frame_follows * swing_db + frame_feels_skip * skip_db
    runner_db = runner_db + crack_lift_db + runners_follow * swing_db + skip_db

    bright_db = 3 * rng.standard_normal(len(CRACKS))   # some cracks are brighter than others
    grit = loose_grit(per_s=76, spread_db=4.0)
    crumbs = np.minimum(grains(170.0, 2.2, 0.7, t60=0.014), 2.2)   # lumps of crust giving way in turn
    body = (booming(hull_db) + thumps()) * amp([[.2], [-.2]])
    runners = crunching(runner_db, grit, bright_db, crumbs)
    runners = runners * amp(np.outer([-1, 1], 0.1 + 1.3 * turn))   # leans to the right with the turn
    spray = spraying(runner_db, grit, bright_db, crumbs)
    left, right = body + droning(frame_db, turn) + runners + spray + jingles() + buffeting()
    return np.array([np.interp(np.arange(N) - port_lag(), np.arange(N), left), right])


def record(dry):
    """Soft saturation and band limiting: peaks are rounded under full scale, then the top is cut."""
    steep = signal.ellip(12, .5, 70, 15750, fs=SR, output="sos")   # order, ripple [dB], stop [dB], edge [Hz]
    rounded = .98 * dry / (.98 ** 6 + dry ** 6) ** (1 / 6)
    return signal.sosfilt(steep, rounded)


dry = scene()
out = record(dry)
master_out(out)
```